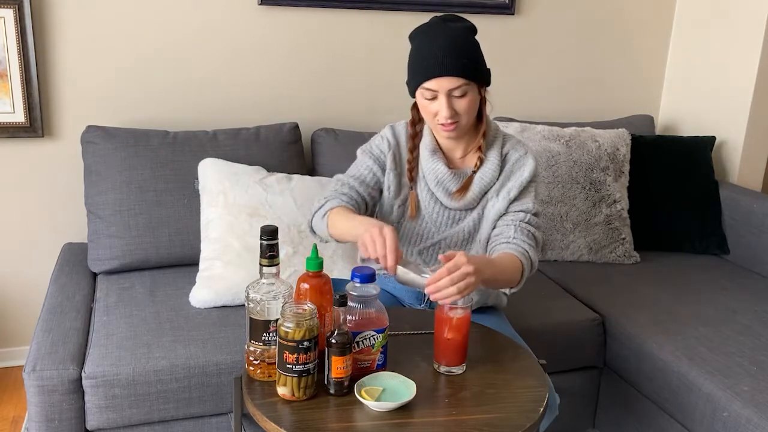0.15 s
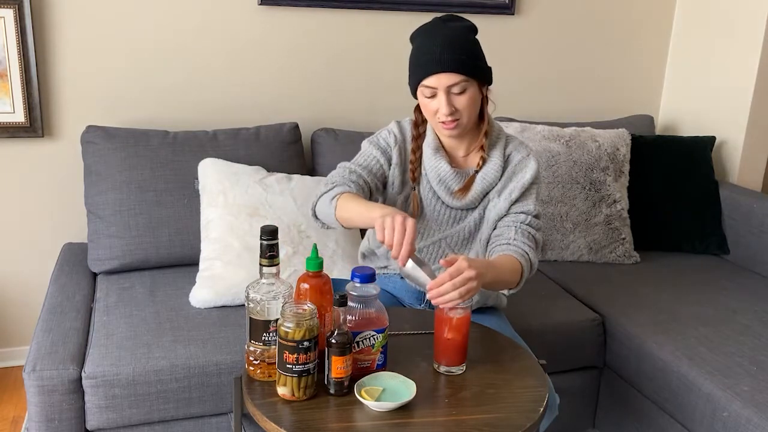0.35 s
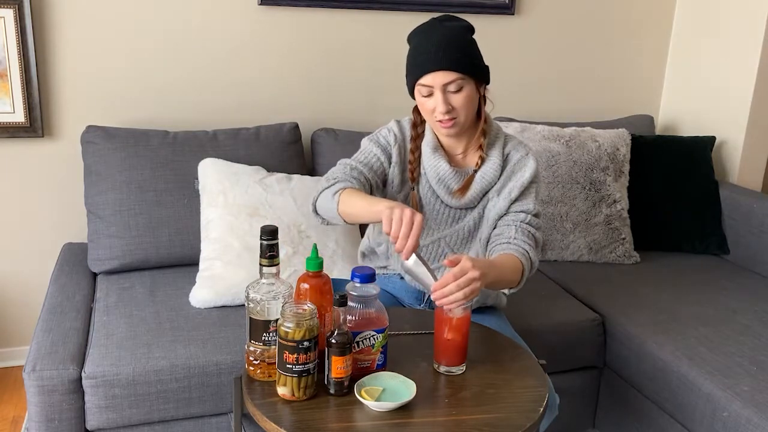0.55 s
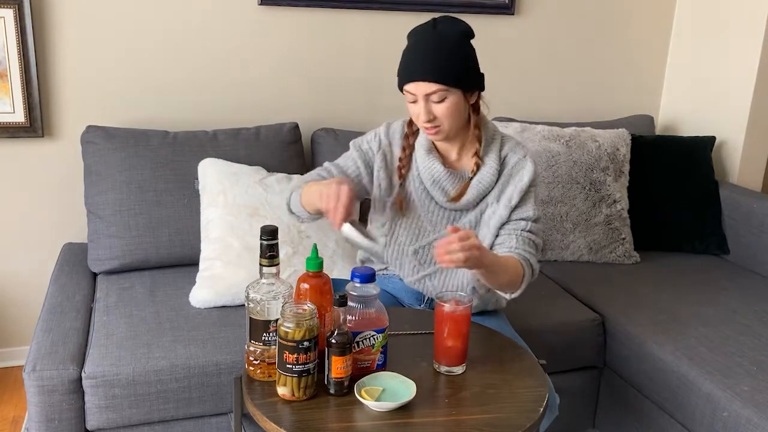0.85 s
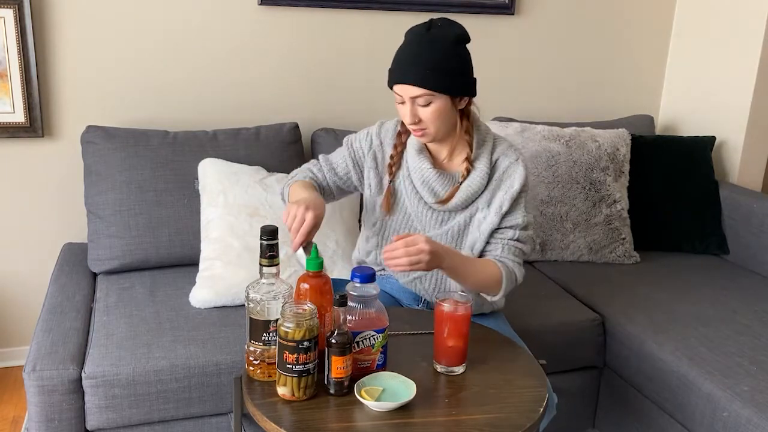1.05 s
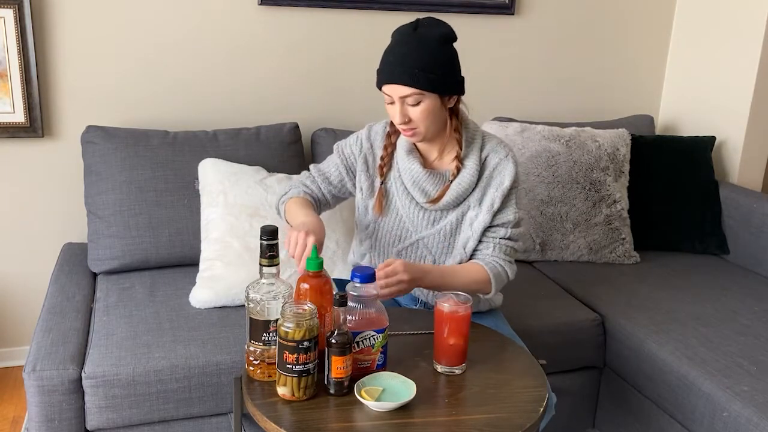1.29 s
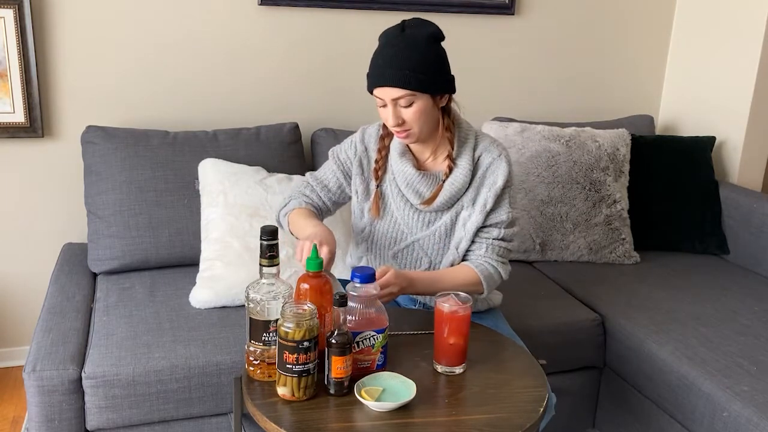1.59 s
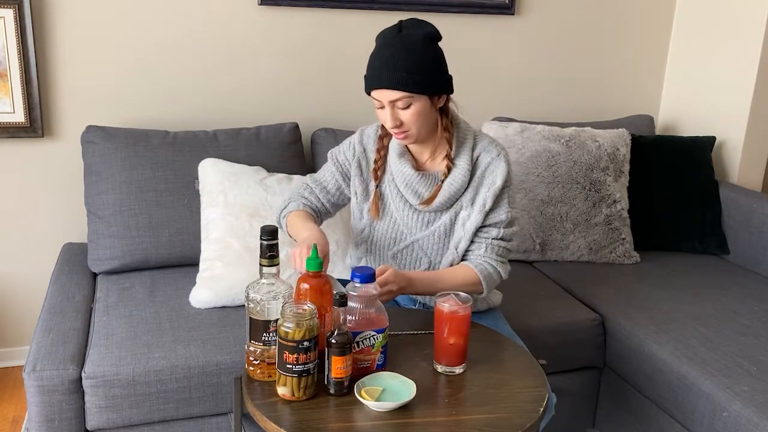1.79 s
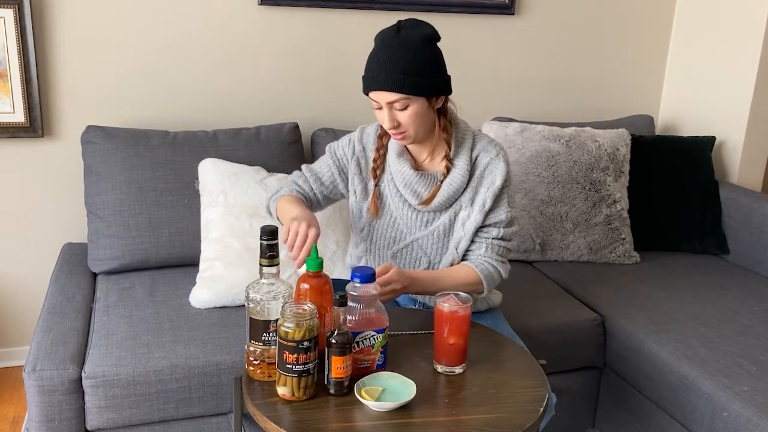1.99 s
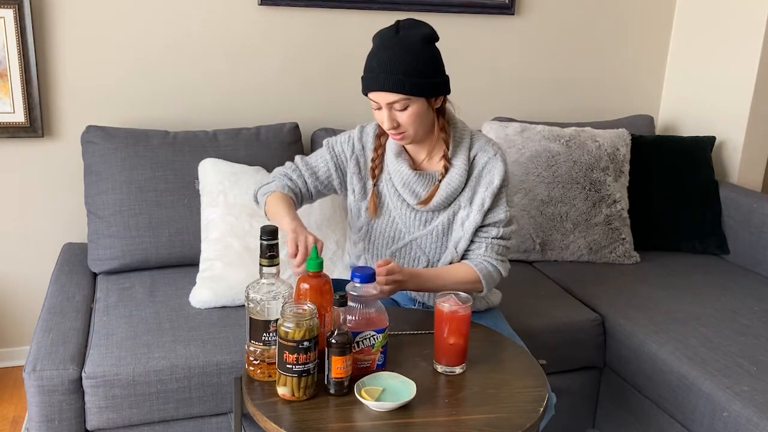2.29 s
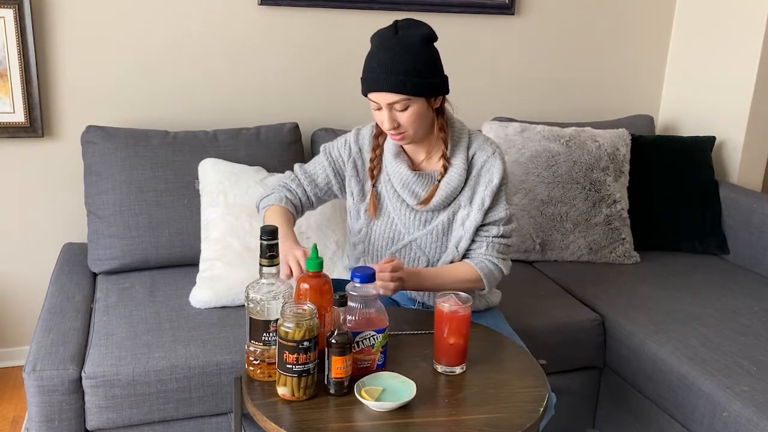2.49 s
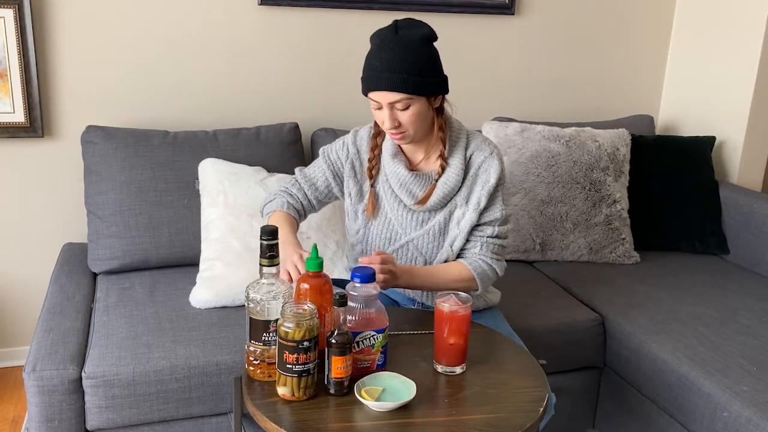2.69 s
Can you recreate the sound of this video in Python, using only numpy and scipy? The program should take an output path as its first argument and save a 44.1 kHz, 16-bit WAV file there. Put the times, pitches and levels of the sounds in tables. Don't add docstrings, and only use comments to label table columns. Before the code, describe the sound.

Ice cubes clink into a full glass, then rattle and crunch as a hand digs through a tub

```python
import sys
import numpy as np
from scipy import signal
from scipy.fft import rfft, irfft, next_fast_len
from scipy.io import wavfile
from scipy.ndimage import uniform_filter1d

SR = 44100
rng = np.random.default_rng(int(sys.argv[2]) if len(sys.argv) > 2 else 0)


def inscribe(sig):
    pcm = np.round(np.clip(np.atleast_2d(sig).T, -1, 1) * 32767)
    wavfile.write(sys.argv[1], SR, pcm.astype(np.int16))


def linear_from_db(decibels):
    return 10 ** (np.asarray(decibels, float) / 20)


N = 125685

# [t/s, peak level/dB, treble over it/dB, table thump over it/dB]
DROPS = [
    (0.2056, -23.5, -17.5, -16.5),
    (0.42, -41.5, -10, -9.5),
    (0.487, -31.5, -22, 3),
    (0.525, -33, -38, -6.5),
    (0.616, -45, -31, -17),
    (0.644, -53, -42, -30),
    (0.848, -53.5, -31, -10),
    (0.884, -91, -37.5, -13),
    (1.112, -68.5, -16.5, 4),
]
# [t/s, level/dB]
SLIDE = [
    (.205, -97),
    (.24, -64.5),
    (.36, -64),
    (.415, -61.5),
    (.432, -44.5),
    (.46, -61),
    (.5, -66.5),
    (.6, -70.5),
    (.72, -102),
]
# [t/s, peak level/dB, treble over it/dB, favoured pitch f/Hz]
KNOCKS = [(1.159, -26.5, -12.5, 2120), (1.204, -29.5, -12, 1440), (1.255, -22, -13, 2120),
          (1.359, -30.5, -20.5, 990), (1.405, -25.5, -18, 1250), (1.447, -33, -5.5, 1240),
          (1.534, -32, -22, 754), (1.591, -19.5, -18, 1790), (1.642, -32, -31, 1610),
          (1.694, -41, -18, 1160), (1.72, -35.5, -16, 1480), (1.77, -31, -18, 860),
          (1.885, -38.5, -7.5, 1080), (2.135, -38, -6, 704), (2.157, -23.5, -19.5, 2930),
          (2.165, -29.5, -21.5, 1240), (2.276, -29, -14, 1510), (2.353, -32.5, -7.5, 1220),
          (2.453, -35.5, -15, 990), (2.515, -21, -12, 3120), (2.55, -36, -4, 770), (2.681, -38, -18, 980),
          (2.731, -38.5, -65, 1190)]
# [t/s, peak level/dB, treble over it/dB, favoured pitch f/Hz]
RUBS = [
    (1.56, -30, -8.5, 790),
    (1.839, -34, -4, 1020),
    (2.176, -33, -15, 2190),
    (1.21, -36, -13, 1500),
    (1.898, -26, -28, 1150),
    (2.245, -17.5, -14, 3100),
    (2.331, -24.5, -19, 1210),
    (2.476, -46, 5, 1130),
]
# [t/s, level/dB]
STIR = [(1.105, -70.5), (1.152, -70), (1.167, -46), (1.245, -51), (1.29, -45), (1.352, -55.5),
        (1.446, -45.5), (1.53, -49), (1.619, -41), (1.75, -53), (1.899, -42.5), (1.971, -53.5),
        (2.03, -100), (2.13, -79), (2.168, -44), (2.3, -43.5), (2.451, -54.5), (2.56, -53), (2.72, -60),
        (2.801, -68.5)]
# [t/s, peak level/dB, pitch f/Hz]
TICKS = [(0.2051, -23.5, 7250), (0.2124, -22, 11530), (0.3777, -47, 7900), (0.3844, -42, 7600),
         (0.4281, -33.5, 7350), (0.4855, -26, 10540), (0.4974, -41, 11200), (0.5247, -31.5, 6770),
         (0.6152, -45, 6530), (0.6204, -52, 5950), (0.6446, -52, 6900), (0.8471, -51, 7600),
         (1.1602, -33, 7130), (1.1695, -32.5, 7260), (1.2542, -27.5, 5570), (1.2607, -25, 7170),
         (1.3575, -41, 12100), (1.3635, -35.5, 12240), (1.4463, -29, 7840), (1.4518, -31, 6040),
         (1.5166, -47.5, 10700), (1.581, -39, 7400), (1.5896, -33.5, 10740), (1.6104, -35.5, 5900),
         (1.7147, -41.5, 7000), (1.7681, -42, 10400), (1.7735, -37.5, 10700), (1.8813, -49, 8000),
         (1.8834, -31, 5800), (2.1317, -34, 10700), (2.1402, -35, 10450), (2.2315, -34, 5800),
         (2.3522, -44, 10700), (2.354, -26, 11900), (2.4739, -46, 12000), (2.5129, -28.5, 7780),
         (2.5188, -38, 7800)]
# [t/s, level/dB, f/Hz, t60/s]
CLINKS = [(.487, -31, 694, .05), (.487, -35, 840, .05), (.487, -38, 560, .05), (.526, -37, 1120, .07),
          (.526, -41, 2750, .025), (.526, -45, 3400, .025), (.526, -40, 1030, .04), (.42, -48, 3200, .03),
          (.425, -49, 1500, .04), (.44, -50, 2150, .05), (1.122, -55, 272, .07), (1.131, -55, 272, .07),
          (.55, -50, 2780, .15), (.6, -46, 380, .06), (.887, -56, 1103, .12), (.848, -57, 800, .03),
          (1.161, -36, 2125, .05), (1.255, -34, 2125, .05), (2.232, -48, 5950, .04),
          (2.133, -45, 5650, .06), (.205, -36, 7300, .025), (1.594, -32, 1480, .05),
          (1.596, -33, 1120, .05), (1.358, -36, 900, .03), (2.353, -33, 1150, .03), (2.356, -35, 1430, .03),
          (2.453, -42, 1000, .02), (1.769, -42, 950, .02), (2.68, -40, 900, .03), (2.514, -37, 2750, .02),
          (2.514, -40, 7800, .03)]
# [t/s, level/dB, f/Hz, t60/s]
CHIMES = [
    (1.875, -46.5, 1868, 1.1),
    (1.893, -45, 3348, .7),
    (1.83, -57, 3348, .5),
    (1.41, -56, 3348, .9),
    (2.3, -56, 3348, .5),
    (2.53, -56, 3348, 1.2),
    (2.726, -45, 3372, .16),
    (2.7, -66, 7250, .3),
    (2.68, -68, 5200, .4),
    (1.85, -58, 6050, .3),
]
# [f/Hz, level/dB, t60/s]
CUBE_MODES = [(4250, -2, .025), (5850, -1, .022), (7200, 0, .018), (8200, -1, .02), (10800, 2, .02)]
# [f/Hz, level/dB, t60/s]
TABLE_MODES = [(290.5, -3, 0.16), (315.3, 0, 0.12), (327, -16, 0.077), (401.3, 2.5, 0.092),
               (431, 5.5, 0.02)]
# [f/Hz, width/Hz, level/dB]
TUB_MODES = [(311.7, 11, 9), (469, 53, 10), (701, 67, 10), (783, 25.2, 7), (988, 12, 15.5),
             (1101, 82, 11.5), (1150, 16, 12), (1303, 37, 8.5), (1523, 35, -5.5), (1548, 81, 9),
             (1835, 32, 2), (2120, 14, 2.5)]
# [f/Hz, level/dB]
TUB_COLOUR = [(59, -21), (100, -3.5), (220, -8.5), (310, -2.5), (881, -9.5), (1500, -7), (3780, -17),
              (6000, -22.5), (7800, -40.5), (13200, -120)]
# [f/Hz, level/dB]
GLASS_COLOUR = [(500, -21), (850, -17.5), (1150, -8), (2100, -6), (3000, -10.5), (5000, -14.5), (6500, -27),
                (9000, -47.5)]
# [f/Hz, level/dB]
SNAP_COLOUR = [(3500, -39), (5000, 3), (7200, -3), (9000, 7.5), (11000, 0.5), (15600, -3.5), (16000, -24.5),
               (16900, -27)]
# [f/Hz, t60/s]
ROOM_DECAY = [(200, 0.41), (1000, 0.33), (4000, 0.28), (12000, 0.18)]
# [f/Hz, likeness 0 to 1]
ROOM_LIKENESS = [(60, 0.99), (330, 0.63), (600, 0.19), (2000, 0), (5000, 0)]
# [f/Hz, level/dB]
AIR_COLOUR = [(20, -29), (50, 2), (180, 1.5), (600, -60), (1400, -41), (2280, -26.5), (6500, -32),
              (12000, -33), (12600, -101.5)]
# [f/Hz, level/dB]
HUM = [(119, -71.5), (174, -70.5), (2300, -93)]
# [f/Hz, phase/rad]
LEFT_LEAD = [(0, 0), (3400, .7), (5600, 2.1), (7500, -.4), (9080, -np.pi), (16050, -4 * np.pi)]

KNOCK_RISE_S, RUB_RISE_S = 0.0014, 0.0057


def unit(x):
    return x / np.sqrt(np.mean(x ** 2) + 1e-20)


def along(points, hz):
    f, v = np.transpose(points)
    return np.interp(np.log(hz + 1), np.log(f + 1), v)


def over_time(points):
    return linear_from_db(np.interp(np.arange(N) / SR, *np.transpose(points), left=-120))


def filtered(x, response):
    m = next_fast_len(x.shape[-1] + 8192)
    return irfft(rfft(x, m) * response(np.fft.rfftfreq(m, 1 / SR)), m)[..., :x.shape[-1]]


def causal(gain):
    c = irfft(np.log(np.abs(gain) + 1e-6))
    c[1:len(c) // 2] *= 2
    c[len(c) // 2 + 1:] = 0
    scale = unit(np.abs(gain)).max() / np.abs(gain).max()
    return scale * np.exp(rfft(c))


def coloured(x, colour):
    return filtered(x, lambda f: causal(linear_from_db(along(colour, f))))


def add(track, s, sound):
    part = track[round(s * SR):][:len(sound)]
    part += sound[:len(part)]


def ring(hz, db, t60, attack=0.00074):
    t = np.arange(SR // 2) / SR
    return linear_from_db(db - 60 * t / t60) * np.sin(2 * np.pi * hz * t) * (1 - np.exp(-t / attack))


def clump(rise):
    length_s, loss_db, spread_db, click_t60 = 0.014, 4, 5, 0.015
    t = np.arange(SR // 10) / SR
    at = np.r_[0, np.cumsum(rng.uniform(0.3, 1, 4)) * length_s / 2][:, None]
    luck = np.abs(rng.standard_normal(at.shape)) * (at > 0)
    db = -loss_db * at / length_s - spread_db * luck
    clicks = linear_from_db(db - 60 * np.abs(t - at) / click_t60) * np.clip((t - at) / rise, 0, 1)
    return clicks.sum(axis=0) * rng.standard_normal(len(t))


def snap(x):
    return coloured(x, SNAP_COLOUR)


def patchy(x):
    z = signal.stft(x, nperseg=512)[2]
    field = uniform_filter1d(rng.standard_normal(z.shape), size=5, axis=0)
    field = uniform_filter1d(field, size=8, axis=1)
    depth = np.minimum(np.arange(len(z)) / 8, 1)[:, None] ** 2
    return signal.istft(z * linear_from_db(4.5 * unit(field) * depth), nperseg=512)[1][:N]


def thump(db):
    return sum(ring(hz * rng.normal(1, 0.012), db + level, t60, attack=0.0056) for hz, level, t60 in TABLE_MODES)


def drops():
    body, top, table = np.zeros((3, N))
    for s, db, top_db, thump_db in DROPS:
        hit = clump(KNOCK_RISE_S)
        add(body, s, linear_from_db(db - 3) * hit)
        add(top, s, linear_from_db(db + top_db + 9.5) * hit)
        add(table, s, thump(db + thump_db))
    return coloured(body, GLASS_COLOUR) + snap(top) + table


def slide():
    scrape = unit(patchy(rng.standard_normal(N))) * over_time(SLIDE)
    scrape[np.arange(N) / SR > SLIDE[-1][0]] *= linear_from_db(-18)
    return coloured(scrape, GLASS_COLOUR) + linear_from_db(-0.5) * snap(scrape)


def cube():
    return sum(ring(hz * rng.normal(1, 0.0277), db - 2 + rng.normal(0, 3.8), t60) for hz, db, t60 in CUBE_MODES)


def favour(hit, hz):
    width = 0.54 * hz

    def focus(f):
        thin = 1j * f / (hz / 2 + 1j * f)
        peak = 1j * f * width / (hz * hz - f * f + 1j * f * width)
        return thin + linear_from_db(11.5) * peak

    return filtered(hit, focus)


def stirring():
    contacts_per_s, spread_db, contact_t60 = 270, 1.5, 0.019
    chance, size = rng.random(N), rng.exponential(size=N)
    hits = (chance < contacts_per_s / SR) * linear_from_db(spread_db * np.minimum(size, 2.5))
    fall = linear_from_db(-60 / (contact_t60 * SR))
    shape = signal.lfilter([1], np.convolve([1, -fall], [1, -fall ** 4]), hits)
    return unit(patchy(shape * rng.standard_normal(N))) * over_time(STIR)


def tub_response(f):
    peaks = sum(linear_from_db(db) ** 2 * w * w / (w * w + 4 * (f - c) ** 2) for c, w, db in TUB_MODES)
    return causal(linear_from_db(along(TUB_COLOUR, f)) * np.sqrt(1 + linear_from_db(-8) * peaks))


def tub():
    body, top, cubes = np.zeros((3, N))
    for events, rise in [(KNOCKS, KNOCK_RISE_S), (RUBS, RUB_RISE_S)]:
        for s, db, top_db, hz in events:
            hit = clump(rise)
            add(body, s, linear_from_db(db - 9.5) * favour(hit, hz))
            add(top, s, linear_from_db(db + top_db + 5) * hit)
            add(cubes, s, linear_from_db(db + top_db) * cube() * KNOCK_RISE_S / rise)
    rattle = stirring()
    return filtered(body + rattle, tub_response) + snap(top + linear_from_db(-10.5) * rattle) + cubes


def ticks():
    crack, note = np.zeros((2, N))
    t = np.arange(SR // 40) / SR
    for s, db, hz in TICKS:
        add(crack, s, linear_from_db(db - 4 - 60 * t / 0.006) * rng.standard_normal(len(t)))
        add(note, s, ring(hz, db + 2.5, 0.008))
    return snap(crack) + note


def glass(notes, gain_db, attack, blur):
    out = np.zeros(N)
    for s, db, hz, t60 in notes:
        neighbours = [ring(hz * (1 + blur * k), db + gain_db, t60, attack) for k in rng.standard_normal(2)]
        add(out, s, sum(neighbours) / 2)
    return out


def pair(noise):
    def turn(hz):
        return np.arccos(np.clip(along(ROOM_LIKENESS, hz), -1, 1)) / 2

    mid, side = filtered(noise, lambda hz: np.array([np.cos(turn(hz)), np.sin(turn(hz))]))
    return np.array([mid + side, mid - side])


def room(x, size=4096):
    out = np.zeros((2, N + SR))
    first = round(0.006 * SR)
    for start in range(0, N, size):
        hz, t, z = signal.stft(rng.standard_normal((2, SR // 2)), SR, nperseg=256)
        fading = z * linear_from_db(-60 * t / along(ROOM_DECAY, hz)[:, None])
        tail = pair(signal.istft(fading, SR, nperseg=256)[1])
        wet = signal.fftconvolve(x[None, start:start + size], tail / np.linalg.norm(tail[0]), axes=1)
        out[:, start + first:][:, :wet.shape[1]] += wet
    return out[:, :N]


def air():
    t = np.arange(N) / SR
    hiss = filtered(rng.standard_normal((2, N)), lambda f: linear_from_db(along(AIR_COLOUR, f)))
    out = linear_from_db(-68.5) * unit(pair(hiss))
    for hz, db in HUM:
        sway_db = 6 * unit(uniform_filter1d(rng.standard_normal(N), size=3000))
        out += linear_from_db(db + sway_db - 2.5) * np.sin(2 * np.pi * hz * t)
    return out


def scene():
    ice = drops() + slide() + tub() + glass(CLINKS, 7, 0.002, 0.012)
    chime = glass(CHIMES, -1.3, 0.008, 0)
    tick = ticks()
    wet = room(ice + linear_from_db(-13) * chime + linear_from_db(-2) * tick)
    return (ice + chime + tick + wet) * linear_from_db([[1], [-1]]) + air()


def apart():
    since = np.arange(N)[:, None] / SR - np.array([s for s, db, hz in TICKS if db > -44])
    after_tick = ((since > 0) & (since < 0.016)).any(axis=1) * 1.0
    return 0.025 + 0.35 * uniform_filter1d(after_tick, size=200)


def treble_share(f):
    return 1 / (1 + (7300 / (f + 1)) ** 20)


def treble_phase(f):
    def steps(turn):
        return turn - np.sin(2 * turn) / 2

    lead = steps(steps(np.interp(f, *np.transpose(LEFT_LEAD))))
    return np.exp(0.5j * lead * np.array([[1], [-1]])) * (f < 16950)


def low_pass(x):
    return signal.sosfilt(signal.butter(12, 16970, fs=SR, output="sos"), x)


def record(dry):
    right = dry[[1, 1]]
    low = filtered(dry, lambda f: (1 - treble_share(f)) * treble_phase(f))
    high = filtered(right + apart() * (dry - right), lambda f: treble_share(f) * treble_phase(f))
    return low_pass(low + high)


dry = scene()
out = record(dry)
inscribe(out)
```